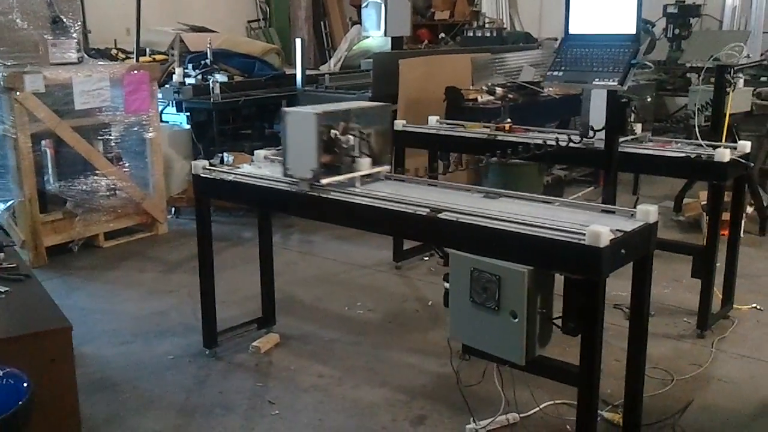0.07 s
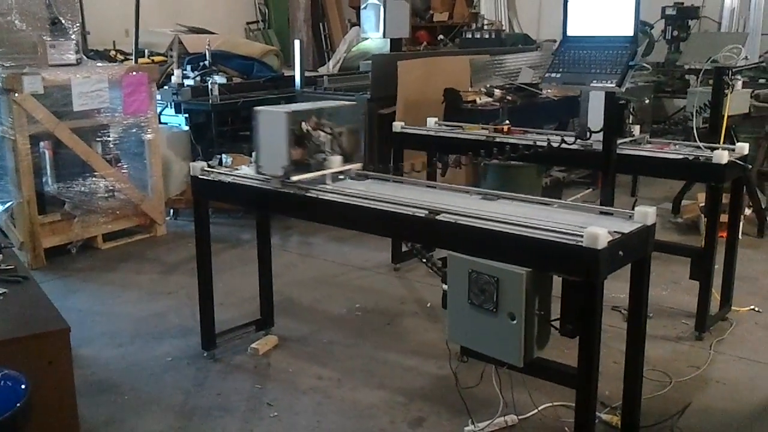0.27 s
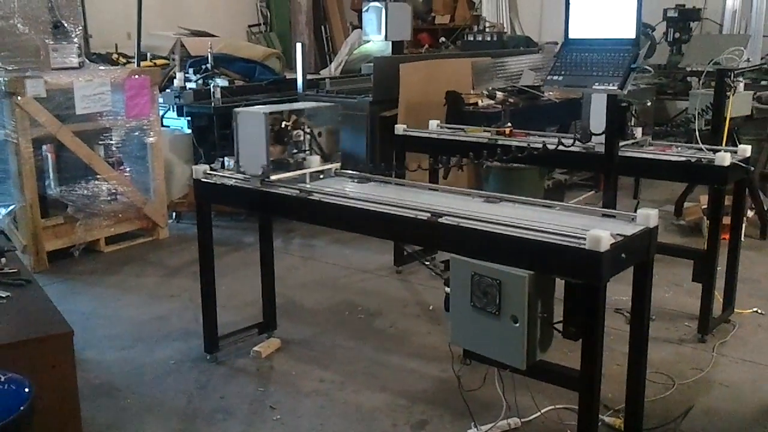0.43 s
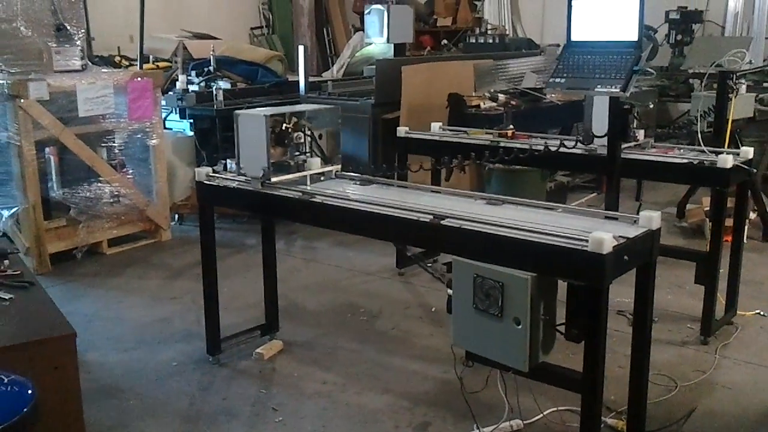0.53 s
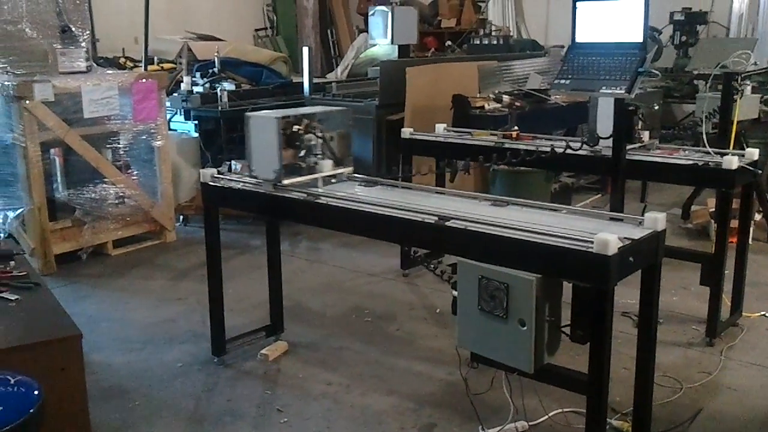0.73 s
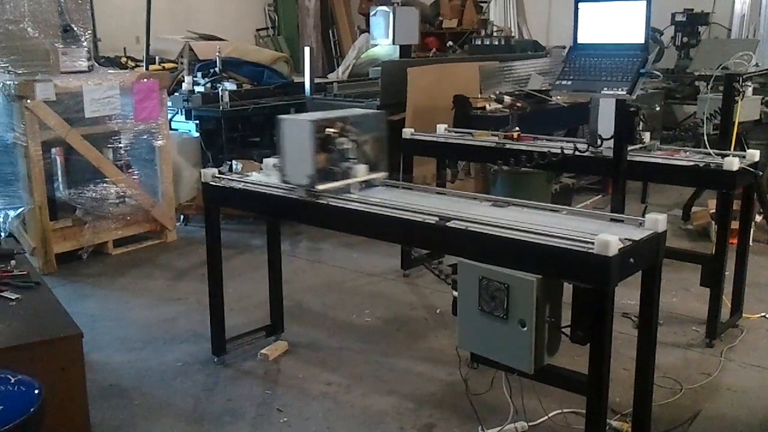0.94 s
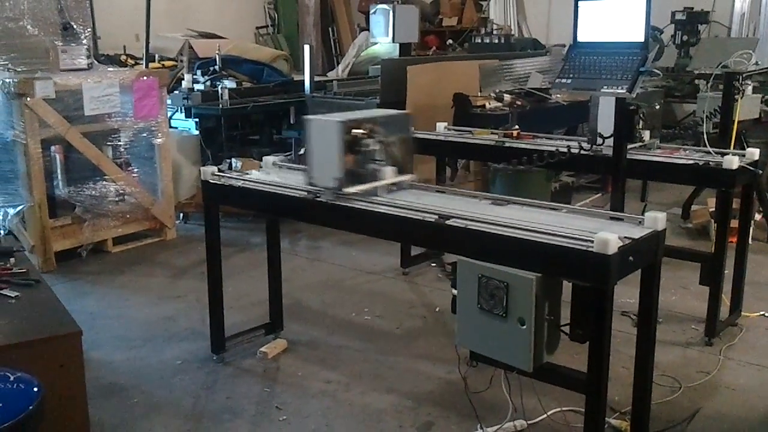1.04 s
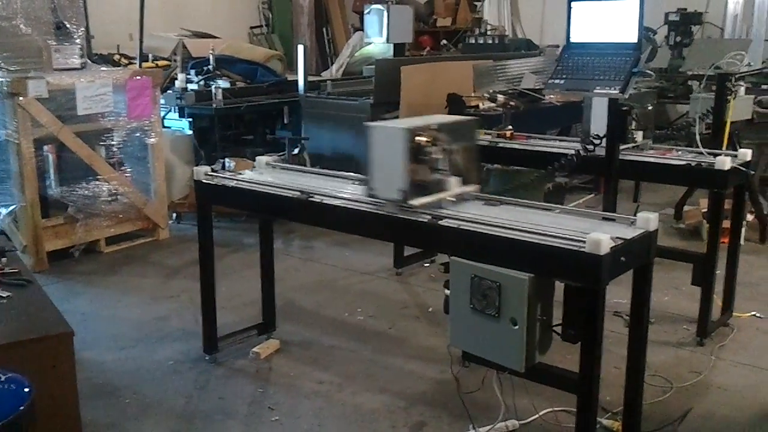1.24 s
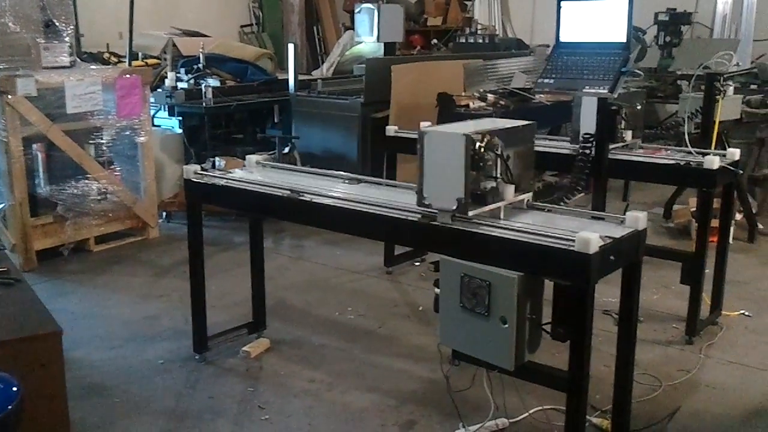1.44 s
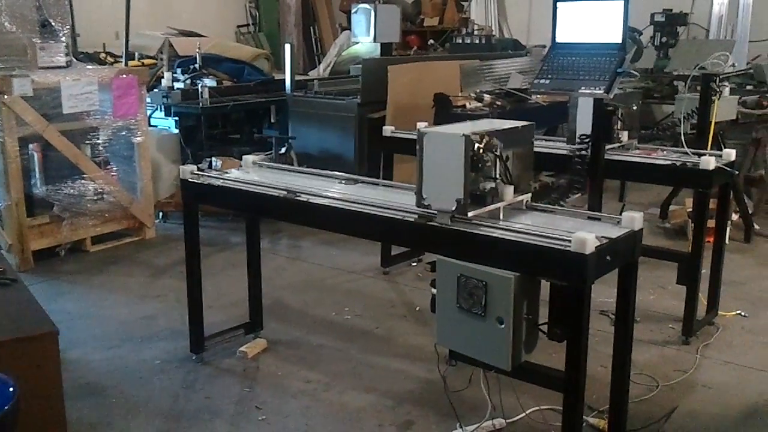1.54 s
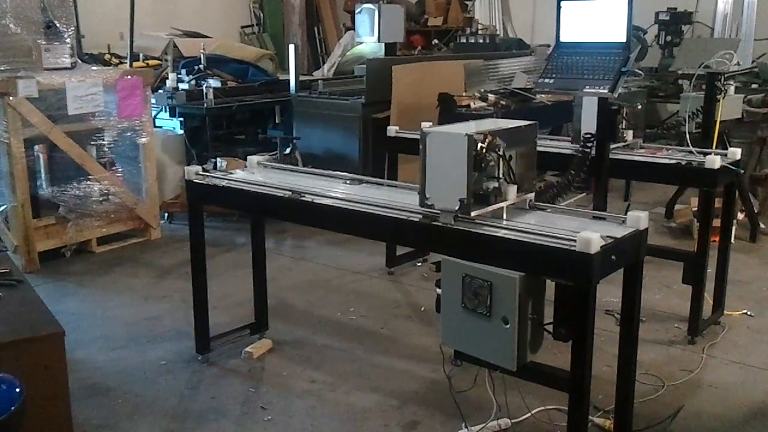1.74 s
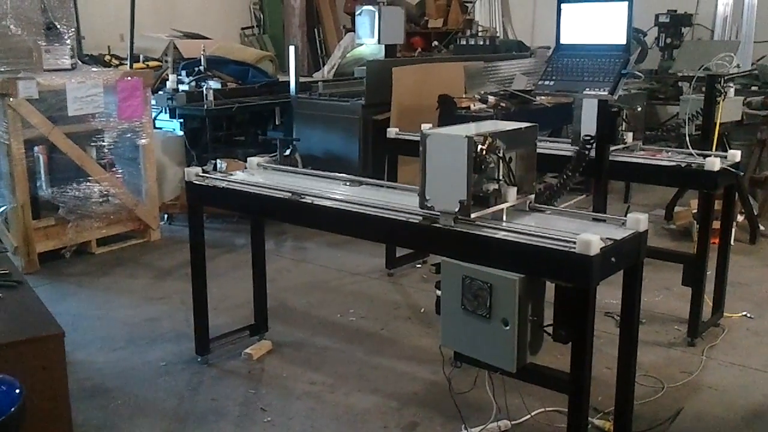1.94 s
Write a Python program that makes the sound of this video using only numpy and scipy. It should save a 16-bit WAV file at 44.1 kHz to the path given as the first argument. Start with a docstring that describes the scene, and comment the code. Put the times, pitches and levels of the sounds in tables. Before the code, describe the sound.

A machine saw rasps loudly twice, then its carriage rolls with a hiss and growl.

```python
"""A workshop, with a narrow-band microphone near a saw carriage and other machines droning behind.
The carriage runs out along its rail, turns round, returns faster and brakes. Its bearings hiss
and tick on the steel; its belt drive growls, hums and shakes the frame. On the way out the saw head
fires two harsh, ringing bursts that overload the microphone, and its slide thumps between them."""
import sys
import numpy as np
from scipy import signal
from scipy.fft import rfft, irfft, next_fast_len
from scipy.io import wavfile
from scipy.ndimage import map_coordinates

SR = 44100
rng = np.random.default_rng(int(sys.argv[2]) if len(sys.argv) > 2 else 0)


def digitize_waveform(pressure):
    """Quantize a signal to 16-bit integers and store it at the path in sys.argv[1].

    Rows of a 2-D input are taken as channels; values are limited to [-1, 1].
    """
    field = np.atleast_2d(pressure).T
    bounded = np.clip(field, -1, 1)
    quanta = np.round(bounded * 32767).astype(np.int16)
    wavfile.write(sys.argv[1], SR, quanta)


N = 88200


def amp(db):
    """Decibels to gain."""
    return 10 ** (np.asarray(db) / 20)


def unit(x):
    """Scale to rms 1."""
    return x / np.sqrt(np.mean(x ** 2) + 1e-20)


def along(points, hz):
    """Read (Hz, value) points on a log frequency axis."""
    knots_hz, values = np.transpose(points)
    return np.interp(np.log(hz + 1), np.log(knots_hz + 1), values)


def clock():
    """Seconds at each sample."""
    return np.arange(N) / SR


def level(rows):
    """Gain per sample from (seconds, dB) rows."""
    return amp(np.interp(clock(), *np.transpose(rows)))


def wander(position):
    """A smooth random curve with a knot at each whole position."""
    return map_coordinates(rng.standard_normal(8192), [position], mode="mirror")


def filtered(x, response):
    """Filter x by a gain given as a function of Hz."""
    size = next_fast_len(N + SR // 2)
    return irfft(rfft(x, size) * response(np.fft.rfftfreq(size, 1 / SR)), size)[:N]


def body(x, spectrum, ripple_db, spacing_hz):
    """x through a structure whose many close modes ripple its spectrum, at rms 1."""
    return unit(filtered(x, lambda hz: amp(along(spectrum, hz) + ripple_db * wander(hz / spacing_hz))))


def noise():
    """White noise."""
    return rng.standard_normal(N)


def contacts(per_s=4500, spread_db=3):
    """Tiny rolling impacts of uneven size."""
    hits = rng.random(N) < per_s / SR
    return unit(hits * np.sign(noise()) * amp(spread_db * noise()))


def blow(start, t60, attack_s=0.00057):
    """Envelope of one impact."""
    age = np.maximum(clock() - start, 0)
    return (1 - np.exp(-age / attack_s)) * np.exp(-np.log(1000) * age / t60)


def head_ring():
    """Noise rings in the narrow steel modes of the saw head, at rms 1."""
    # Each row: frequency in Hz, width in Hz, level in dB.
    modes = [(4388, 16, -3.5), (4708, 18, -6), (4738, 62, -3.5), (5005, 28, -3), (5045, 44, -4.5),
             (5210, 23, -2), (6040, 12, -12.5), (6080, 28, -9.5)]
    return unit(filtered(noise(), lambda hz: sum(
        amp(db) * 1j * hz * width / (centre ** 2 - hz ** 2 + 1j * hz * width)
        for centre, width, db in modes)))


def bearings():
    """Balls patter on the steel rail, brighter at speed; now and then the carriage ticks."""
    # The hiss follows the travel. Each row: time in seconds, level in dB.
    travel = [(0, -22), (.21, -22.5), (.6, -9), (.8, -29.5), (.94, -38), (1.02, -27.5), (1.12, -21),
              (1.27, -16), (1.42, -13.5), (1.62, -14), (1.74, -25), (1.83, -28), (2, -43)]
    # Colour of the rail. Each row: frequency in Hz, level in dB.
    rail = [(300, -46), (2000, -16.5), (2900, -15.5), (3600, -8), (4500, -2.5), (5150, -1), (6100, -9),
            (7300, -11), (12000, -17.5)]
    # Each row: start of a tick in seconds, level in dB.
    rail_ticks = [(1.168, -16.5), (1.308, -22), (1.386, -16), (1.791, -17.5)]
    speed = level(travel)
    rolling = body(contacts() + 0.79 * noise(), rail, ripple_db=0.87, spacing_hz=37.4)
    treble = filtered(rolling, lambda hz: 1 - 1 / (1 + (hz / 5840) ** 10))
    rolling += treble * ((speed / speed.max()) ** 0.19 - 1)  # duller when slow
    rolling += amp(-10) * head_ring()
    flicker = amp(0.5 * wander(clock() * 45))
    ticks = sum(amp(db) * blow(start, t60=0.092, attack_s=0.00078) for start, db in rail_ticks)
    return rolling * speed * flicker + ticks * body(noise(), rail, ripple_db=0.87, spacing_hz=58)


def drive():
    """The belt growls with effort and shakes the table frame."""
    # Strength of growl and rumble. Each row: time in seconds, level in dB.
    effort = [(0, -31.5), (.2, -31.5), (.7, -29.5), (.95, -45), (1.2, -31), (1.33, -22), (1.58, -20.5),
              (1.68, -24), (1.78, -32), (2, -41.5)]
    shake = [(0, -34), (.3, -33), (.65, -29.5), (.78, -38.5), (.95, -43), (1.17, -33), (1.45, -37.5),
             (1.6, -30), (1.7, -35), (1.8, -39), (2, -53.5)]
    # Their colours. Each row: frequency in Hz, level in dB.
    belt = [(200, -40), (550, -6), (850, -3), (1100, -0.5), (1400, 0), (1750, -3.5), (2300, -9),
            (3500, -30), (8000, -58)]
    frame = [(30, -61.5), (90, -27.5), (150, -12.5), (220, -7), (320, 2.5), (450, -3.5), (700, -7),
             (1500, -14.5), (5000, -47)]
    growl = body(contacts(), belt, ripple_db=2, spacing_hz=28.36) * level(effort)
    rumble = body(noise(), frame, ripple_db=2, spacing_hz=14) * level(shake)
    return growl + rumble


def motor_hum(fade_s=0.027, drift=0.0059):
    """Slightly unsteady tones come and go as the motor pulls and brakes."""
    # Each row: start and end in seconds, pitch in Hz, rms level in dB.
    tones = [(.09, .78, 209, -40.5), (0.062, 0.155, 1346, -35.5), (0, 0.054, 538, -34),
             (1, 1.8, 230, -49.5), (1.53, 1.718, 221, -34), (1.5, 1.72, 495, -34), (1.55, 1.73, 310, -36)]
    t, hum = clock(), np.zeros(N)
    for start, end, hz, db in tones:
        gate = np.clip(np.minimum(t - start, end - t) / fade_s + 0.5, 0, 1)
        phase = 2 * np.pi * np.cumsum(hz * (1 + drift * wander(t * 30))) / SR
        hum += np.sqrt(2) * gate * amp(db + 2.5 * wander(t * 16)) * np.sin(phase)
    return hum


def shop_drone():
    """Other machines drone steadily, farther off."""
    # Each row: frequency in Hz, level in dB.
    colour = [(30, -50.5), (90, -33), (150, -11.5), (260, -8), (700, -7), (1600, -10), (3000, -10),
              (8000, -28.5)]
    return amp(-43.5) * body(noise(), colour, ripple_db=1.5, spacing_hz=22.1)


def bursts(fall_db_per_s, attack_s=0.004, lead_s=0.018):
    """Envelope of the saw's bursts: a light first touch, an abrupt start, a hold and a fall."""
    # Each row: start in seconds, hold in seconds, level in dB.
    firings = [(.2215, 0.072, -1), (0.428, 0.047, -.5)]
    t, power = clock(), np.zeros(N)
    for start, hold, db in firings:
        rise = np.clip((t - start) / attack_s, 0, 1)
        touch = amp(-18) * np.clip((t - start + lead_s) / attack_s, 0, 1)
        fall = amp(db - fall_db_per_s * np.maximum(t - start - hold, 0))
        power += (np.maximum(rise, touch) * fall) ** 2
    return np.sqrt(power)


def saw():
    """The blade hisses harshly, and the ring of the head outlasts it."""
    # Each row: frequency in Hz, level in dB.
    blade = [(150, -21.5), (400, -19.5), (2000, -18.5), (3000, -13), (4100, -8), (5050, -1), (5700, -5.5),
             (6600, -9), (7700, -11.5), (12000, -10)]
    hiss = bursts(fall_db_per_s=86) * body(noise(), blade, ripple_db=1.5, spacing_hz=29.99)
    ring = amp(-8.5) * bursts(fall_db_per_s=65.5) * head_ring()
    return hiss + ring


def slide():
    """The slide hits its stop and chatters: at each blow the housing thuds and sheet metal clacks."""
    # Each row: start in seconds, thud level in dB, clack level in dB.
    blows = [(.32, -10.5, -12.5), (.337, -16, -19), (.36, -28, -16), (.38, -20.5, -18.5),
             (0.395, -24.5, -24)]
    # Each row: frequency in Hz, level in dB, seconds to fall 60 dB.
    housing_modes = [(289.5, -4, 0.16), (350.4, -1, 0.11), (460, 0, 0.095), (728, -12.5, .1)]
    # Each row: frequency in Hz, level in dB.
    sheet_metal = [(60, -40), (200, -14), (300, -1), (430, -2.5), (580, -7), (750, -4), (880, -9.5),
                   (1150, -0.5), (1450, -5), (2400, -11.5), (6000, -34)]
    t, thud, clack = clock(), np.zeros(N), np.zeros(N)
    for start, thud_db, clack_db in blows:
        clack += amp(clack_db) * blow(start, t60=0.19)
        for hz, db, t60 in housing_modes:
            phase = 2 * np.pi * (hz * (t - start) + rng.random())
            thud += amp(thud_db + db) * blow(start, t60) * np.sin(phase)
    return thud + clack * body(noise(), sheet_metal, ripple_db=1, spacing_hz=45.8)


def room(x):
    """The workshop's tail: lows and top die sooner than the middle."""
    # Each row: frequency in Hz, seconds to fall 60 dB.
    decay_times = [(100, 0.62), (1000, 1), (5000, 1), (10000, 0.61)]
    hz, t, bands = signal.stft(rng.standard_normal(SR), SR, nperseg=256)
    decay = np.exp(-np.log(1000) * t / along(decay_times, hz)[:, None])
    tail = signal.istft(bands * decay, SR, nperseg=256)[1]
    return signal.fftconvolve(x, tail / np.linalg.norm(tail))[:N]


def scene():
    """The machine up front, with the room and the shop's drone behind it, in mono."""
    machine = bearings() + drive() + saw() + slide()
    return (machine + amp(-9.5) * room(machine) + motor_hum() + shop_drone())[None]


def record(dry):
    """The microphone rolls off near 8 kHz and overloads on peaks; the distortion is band-limited."""
    # Response before and after the overload. Each row: frequency in Hz, gain in dB.
    microphone = [(20, -14), (100, -1), (7600, 0.5), (8100, -6.5), (8600, -14.5), (9100, -45.5),
                  (9800, -77)]
    after_clip = [(8000, 0), (11000, -6), (13000, -5), (15500, -14.5)]
    ceiling, hardness, top_hz = 0.66, 25, 15850
    heard = filtered(dry[0], lambda hz: amp(along(microphone, hz)))
    clipped = heard / (1 + np.abs(heard / ceiling) ** hardness) ** (1 / hardness)
    return filtered(clipped, lambda hz: amp(along(after_clip, hz)) * (hz < top_hz))[None]


dry = scene()
out = record(dry)
digitize_waveform(out)
```